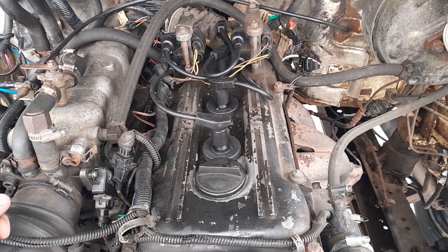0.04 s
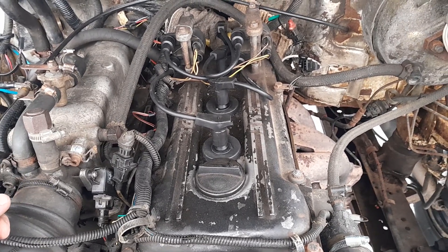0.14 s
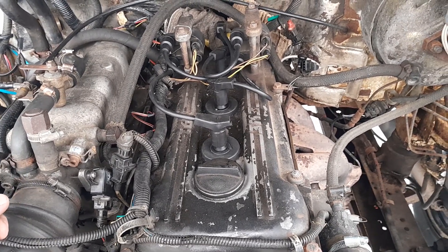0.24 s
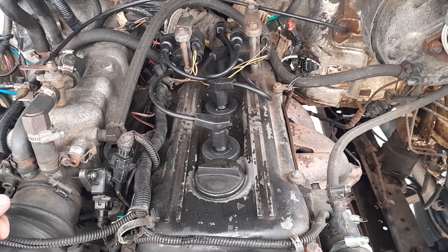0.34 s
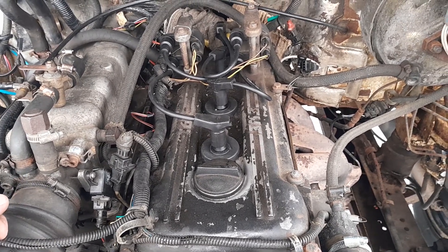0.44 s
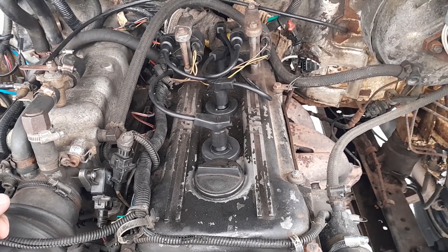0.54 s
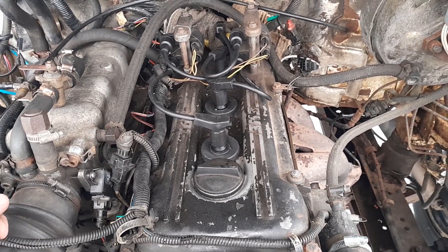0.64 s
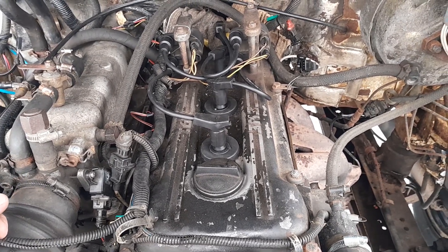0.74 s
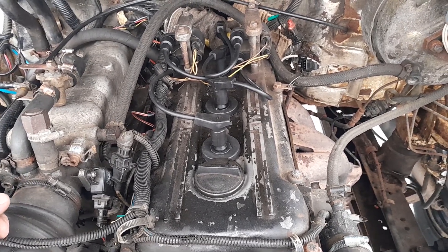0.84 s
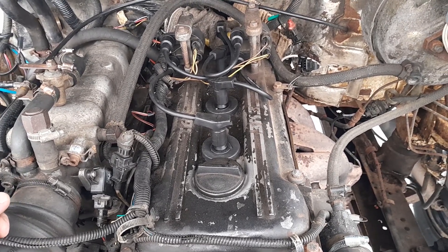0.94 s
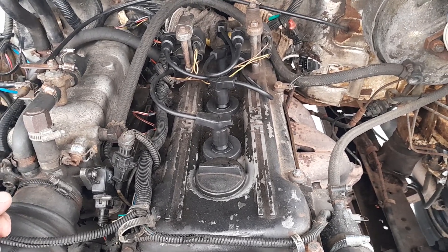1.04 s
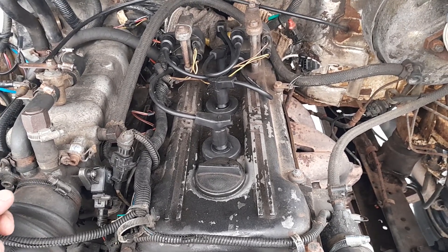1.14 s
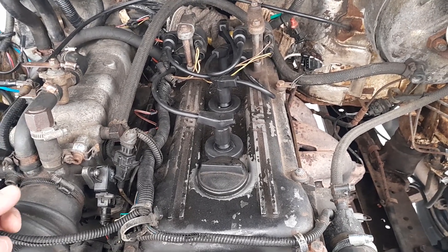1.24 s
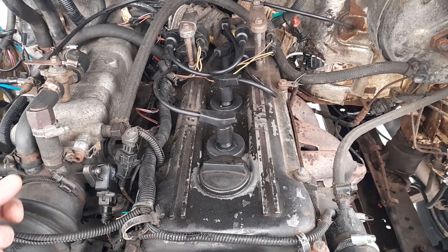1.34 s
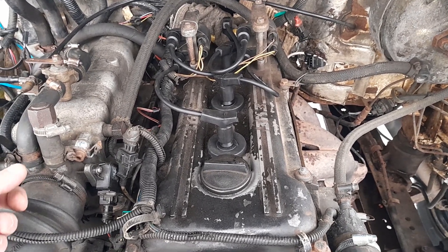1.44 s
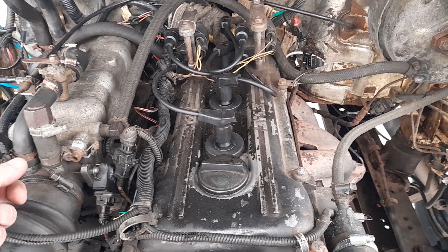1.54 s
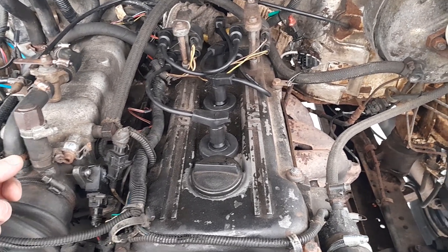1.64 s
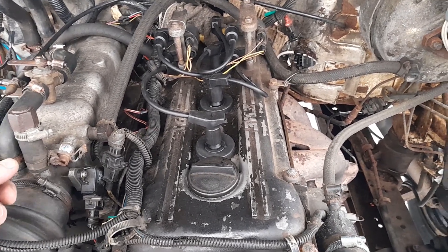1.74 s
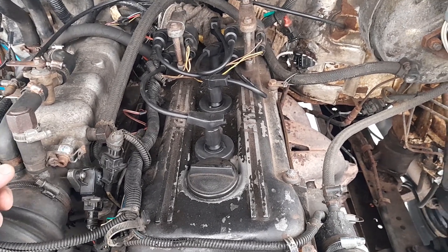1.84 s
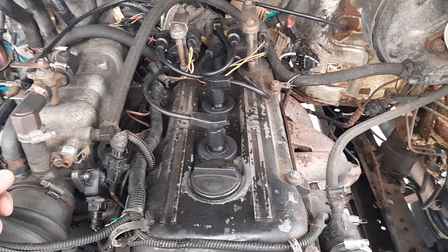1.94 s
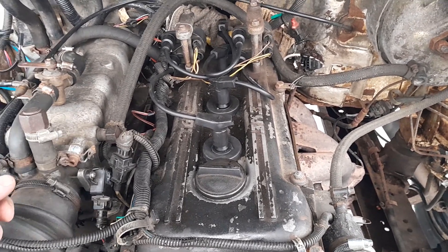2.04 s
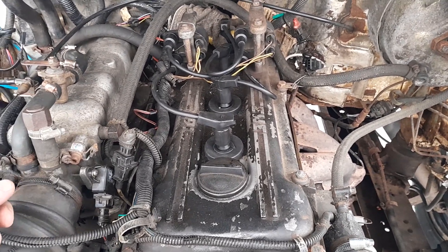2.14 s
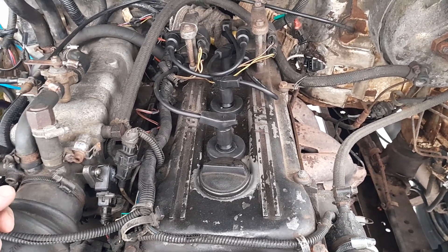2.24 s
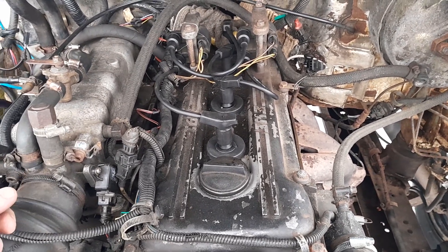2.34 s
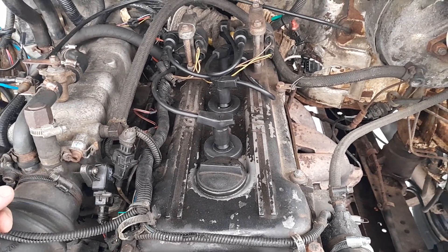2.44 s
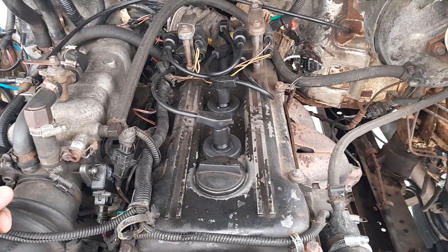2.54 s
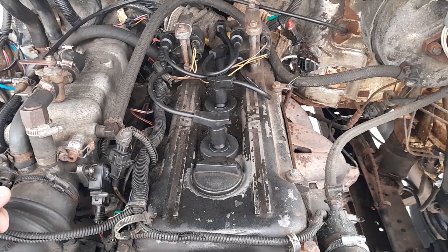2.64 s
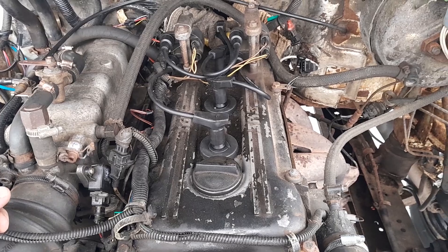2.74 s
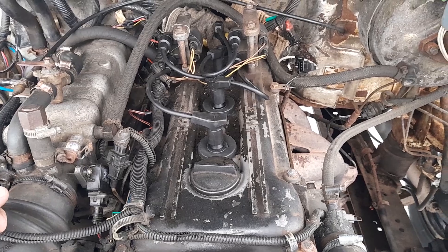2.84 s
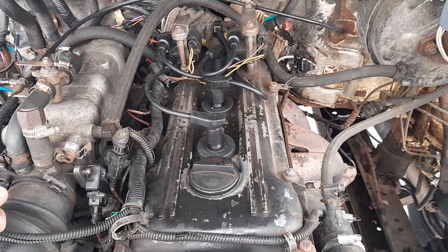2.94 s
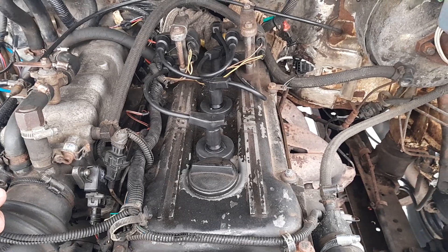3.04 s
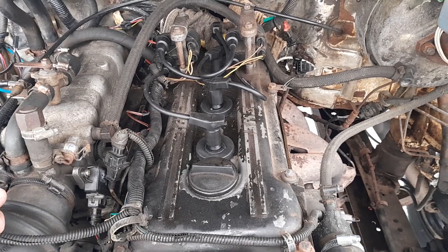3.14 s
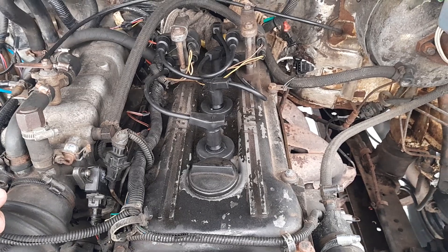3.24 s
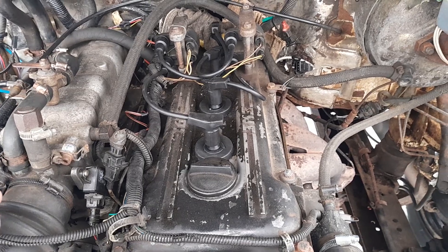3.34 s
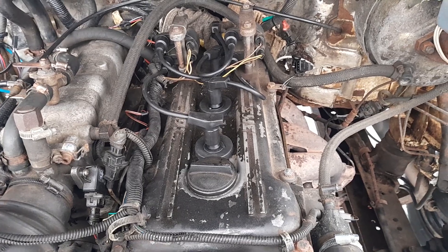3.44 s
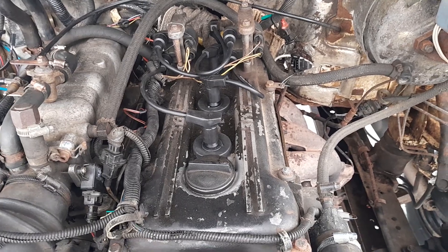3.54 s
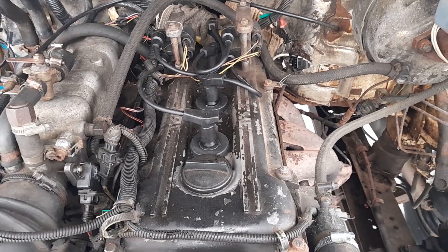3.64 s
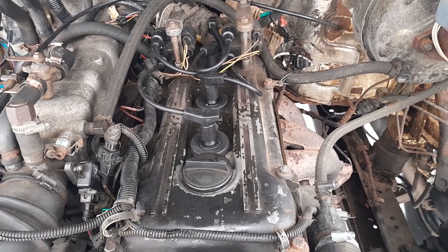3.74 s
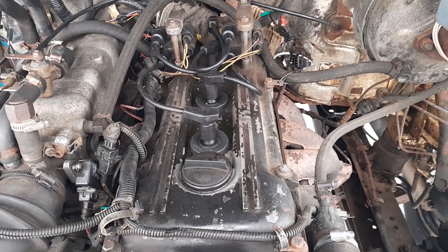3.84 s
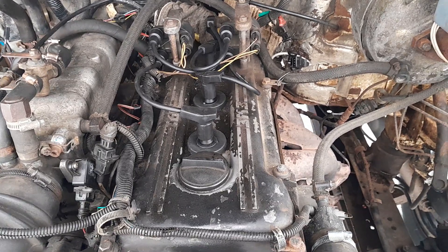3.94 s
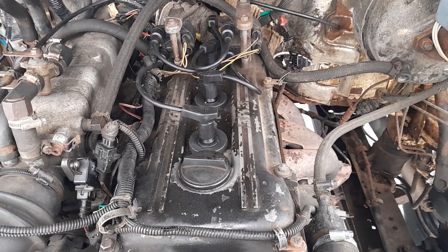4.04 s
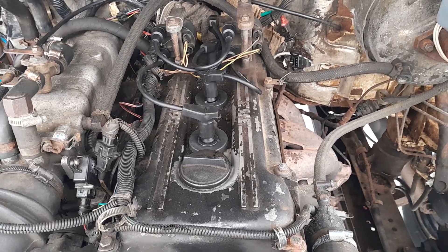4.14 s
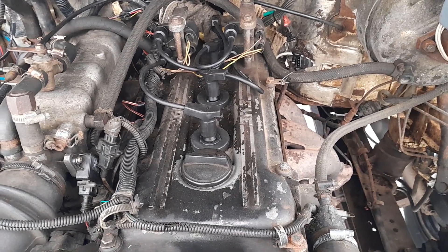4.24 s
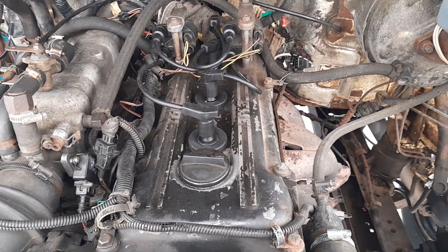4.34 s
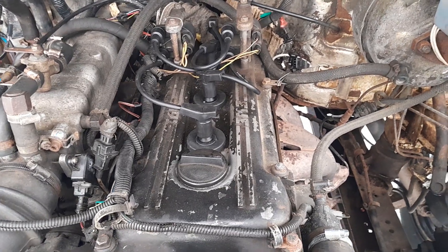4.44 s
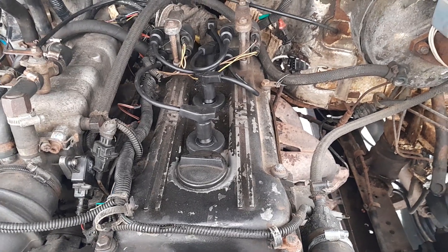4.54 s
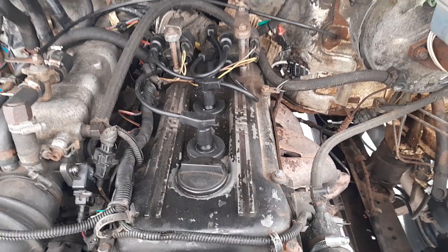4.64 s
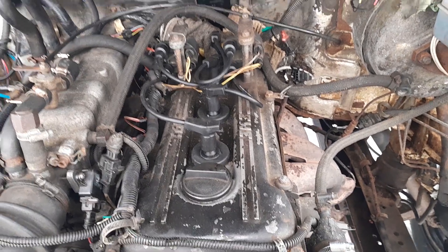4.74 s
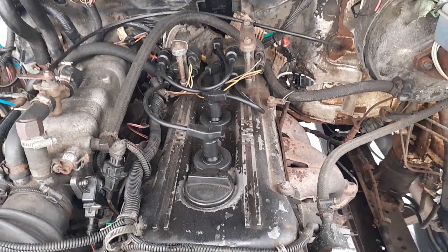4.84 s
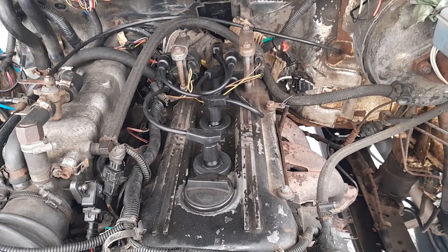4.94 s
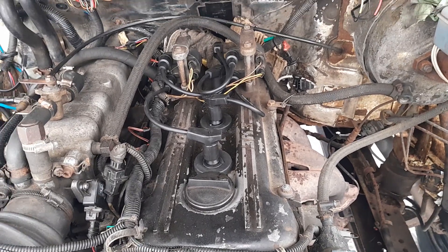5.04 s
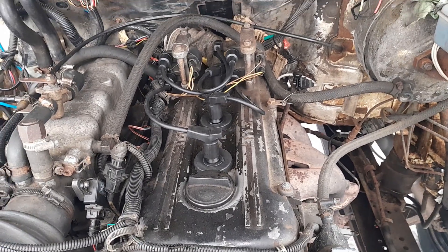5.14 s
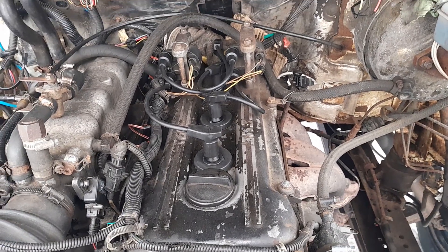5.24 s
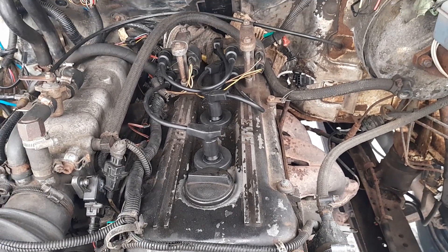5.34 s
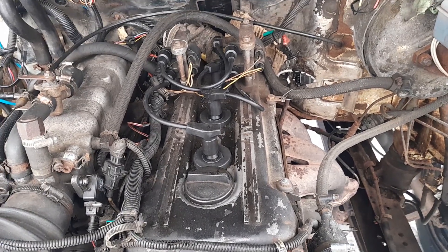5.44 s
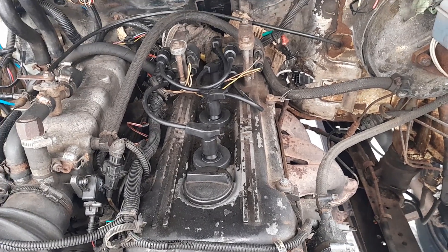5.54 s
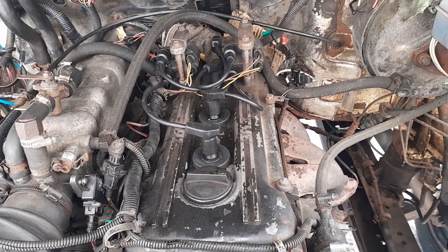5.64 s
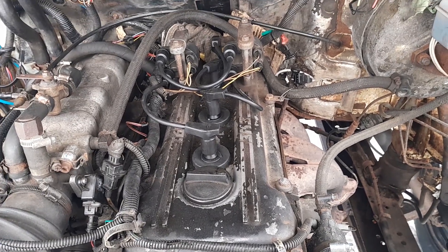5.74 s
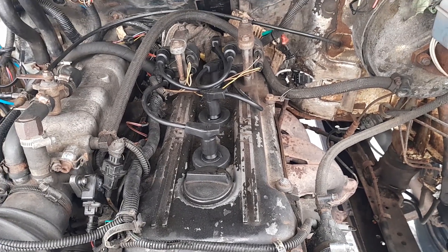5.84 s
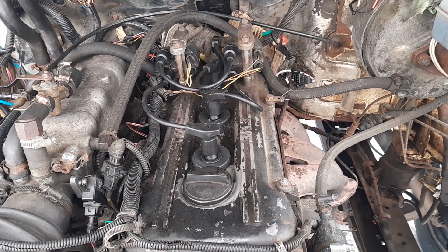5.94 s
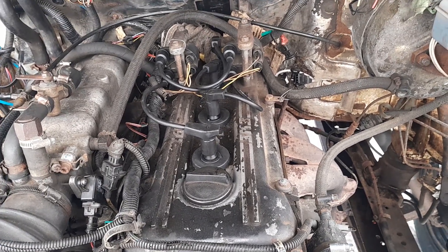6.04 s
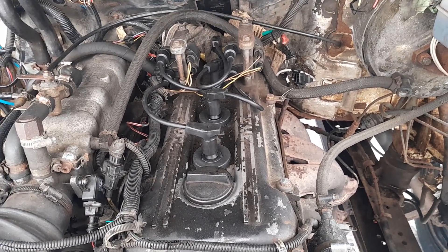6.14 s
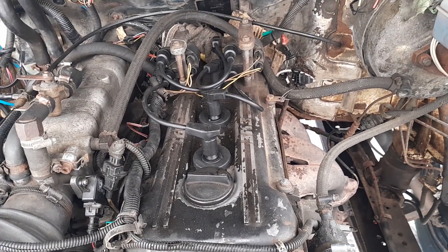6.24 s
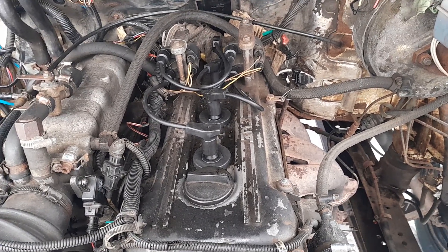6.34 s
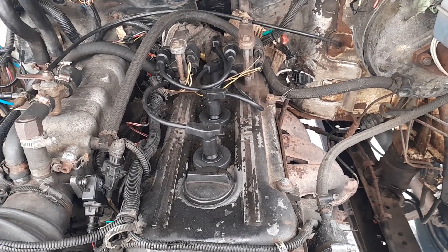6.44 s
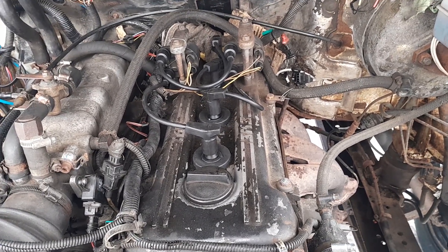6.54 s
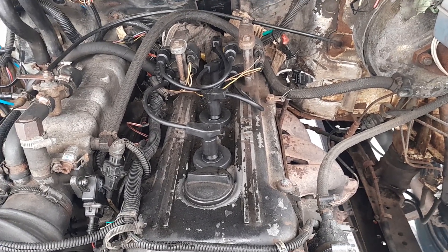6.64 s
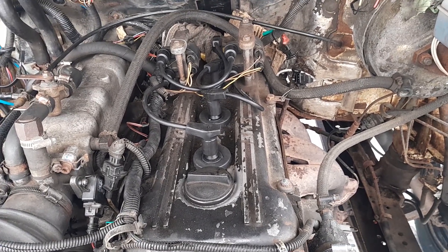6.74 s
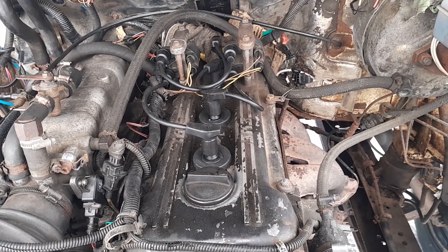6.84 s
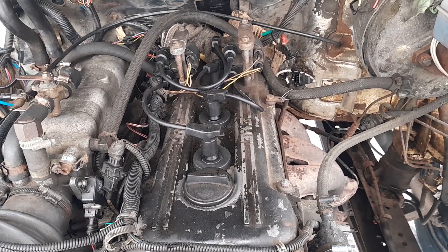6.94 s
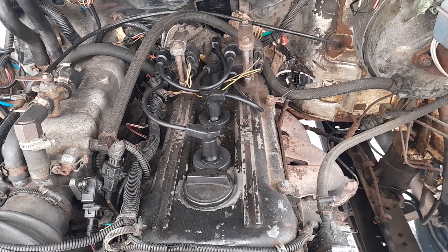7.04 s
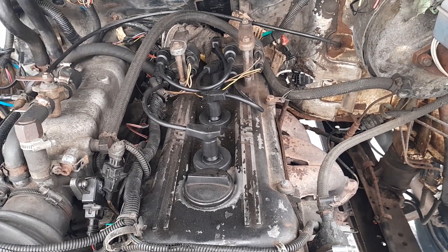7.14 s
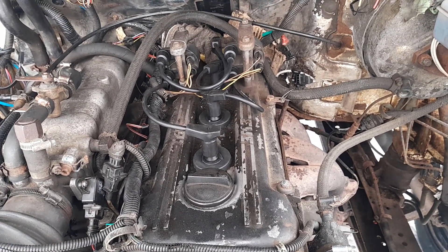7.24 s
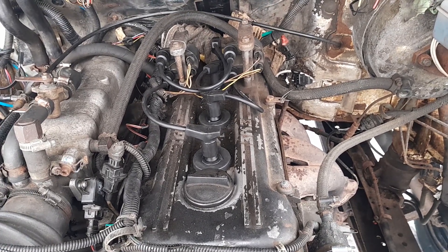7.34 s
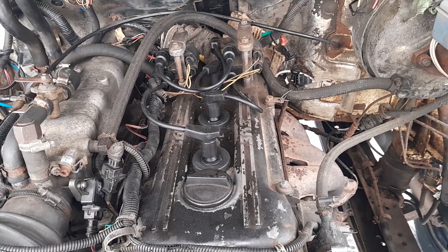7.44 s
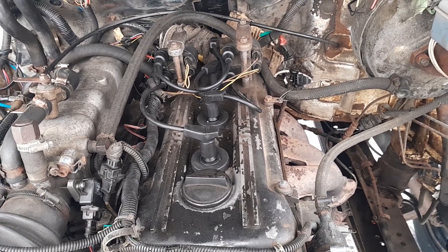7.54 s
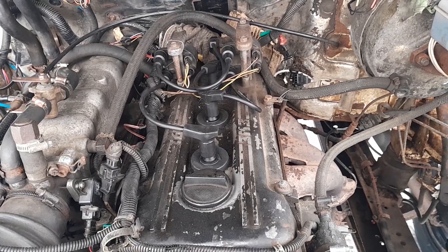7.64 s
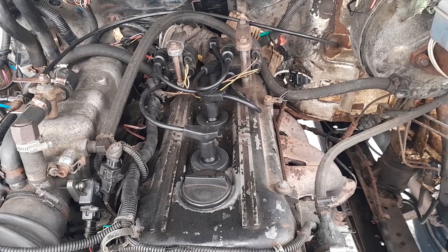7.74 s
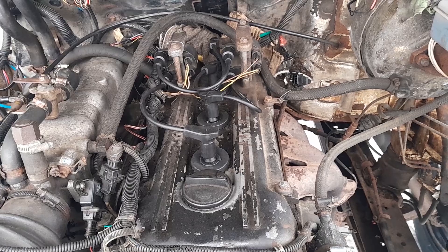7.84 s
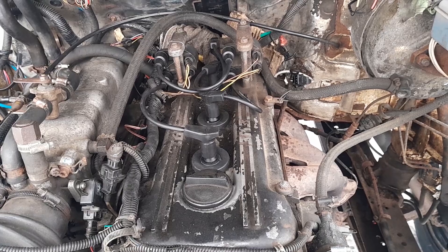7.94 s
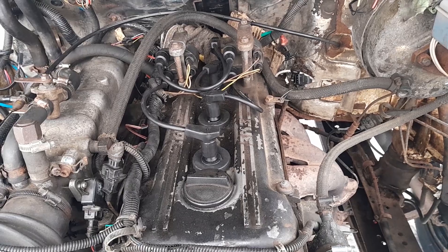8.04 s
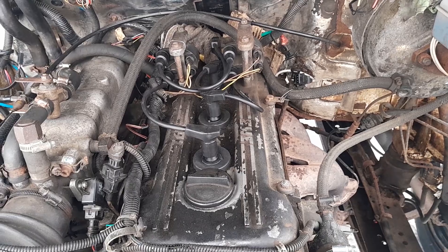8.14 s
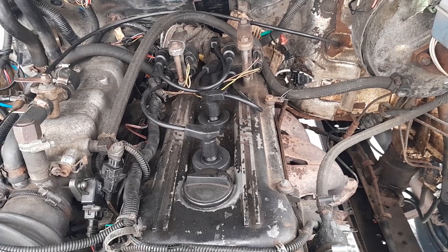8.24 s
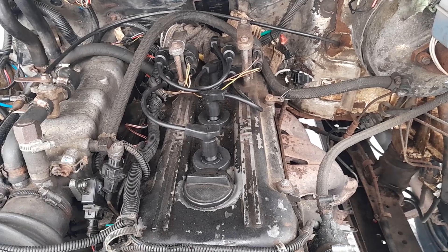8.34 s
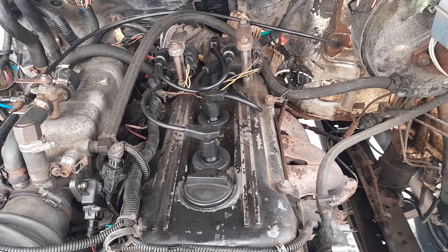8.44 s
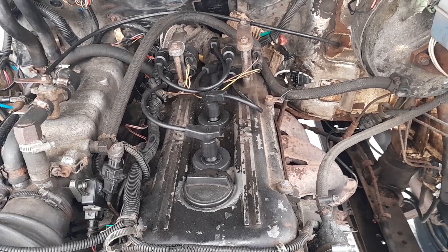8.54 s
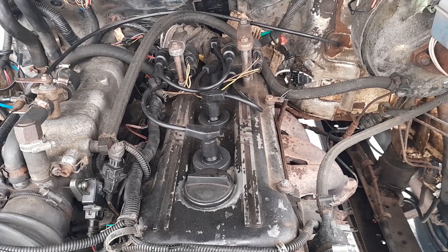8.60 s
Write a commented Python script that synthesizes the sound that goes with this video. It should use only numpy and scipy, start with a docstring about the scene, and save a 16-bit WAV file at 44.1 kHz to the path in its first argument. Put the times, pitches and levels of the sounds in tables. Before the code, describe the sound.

A petrol van engine runs down, revs once in a quick blip, burbles down again and settles into a steady, ticking idle.

```python
"""A four-cylinder petrol van engine under its open hood. It runs down from a blip: exhaust pulses boom and
burble, the block thuds, the belt drive whines, valves clatter, the chain rasps, a panel sings, the throttle
gulps air. As speed sags, a loose tappet ticks through and the idle valve opens with a hiss. At 1.5 s a
second blip lifts the speed to its peak at 2.2 s; a longer, burbling run-down follows. From 4.9 s the idle
takes hold and the whole engine grows louder."""
import sys
import numpy as np
from scipy.fft import rfft, irfft, next_fast_len
from scipy.io import wavfile
from scipy.ndimage import map_coordinates

SR = 44100
rng = np.random.default_rng(int(sys.argv[2]) if len(sys.argv) > 2 else 0)


def digitize_waveform(pressure):
    """Quantize a signal to 16-bit integers and store it at the path in sys.argv[1].

    Rows of a 2-D input are taken as channels; values are limited to [-1, 1].
    """
    field = np.atleast_2d(pressure).T
    bounded = np.clip(field, -1, 1)
    quanta = np.round(bounded * 32767).astype(np.int16)
    wavfile.write(sys.argv[1], SR, quanta)


N = 382347

# Engine speed. Each row: time in seconds, firing rate in Hz.
FIRING_RATE = [(0.0, 86.66), (0.2, 81.38), (0.46, 69.08), (1.0, 52.3), (1.55, 35.51), (1.76, 53.67),
               (2.0, 93.54), (2.2, 123.93), (2.98, 91.34), (3.2, 83.12), (3.44, 71.29), (4.0, 53.84),
               (4.58, 35.6), (5.15, 31.01), (6.25, 31.87), (7.0, 31.44), (8.67, 31.61)]
# Pipe boom, throttle shut. Each row: firing rate in Hz, level in dB.
PIPE_BOOM = [(31, -30), (35, -33.5), (40, -35), (43.5, -25.5), (54, -24.5), (62, -14.5), (72, -16),
             (83, -12), (94, -17.5), (104, -11.5), (122, -13)]
# Exhaust pulse; fractional orders come from unequal cylinders.
# Each row: multiple of the firing rate, overrun weight in dB, loaded weight in dB.
PULSE_ORDERS = [(.5, -33, -32), (.75, -39, -35), (1, 3, 1), (1.5, -28, -33), (2, -23, -5.5),
                (2.75, -45, -22), (3, -18.5, -12.5), (4, -21.5, -15.5), (5, -37.5, -24), (6, -36, -28)]
# Uneven firings. Each row: time in seconds, pop level in dB, drop of the exhaust note in dB.
UNEVEN_FIRINGS = [(.235, -24, -1), (.285, -36, 2), (.57, -23, 16), (.812, -26, -2.5), (.98, -31, 4),
                  (1.02, -29, -3), (1.21, -30.5, 9), (1.29, -36, -6), (1.785, -17, 5.5), (1.855, -30, -1),
                  (1.905, -21, 4), (2.19, -49, 8.5), (2.86, -17, 6), (3.19, -20.5, -1.5), (3.53, -26, 6),
                  (3.75, -25.5, 4), (4.1, -34, -3.5), (4.18, -36, 15), (4.26, -36, -1)]
# Knocks and tappets; the loose tappet strikes twice. Each row: place in the cycle 0-1, weight in dB.
CYCLE_KNOCKS = [(.02, -10.5), (.055, -7), (.095, -4), (.18, -4), (.27, -14), (.31, -2), (.4, -2), (.52, -5),
                (.56, -14.5), (.63, -3), (.7, -7.5), (.785, -6.5), (.84, -2), (.9, -17), (.965, -4)]
TAPPET_STRIKES = [(.105, 5), (.138, 5.5), (.385, -12), (.625, -12), (0.881, -1)]
# Belt and timing gear tones. Each row: multiple of the firing rate, relative level in dB.
WHINE_ORDERS = [(5, -10.5), (6, -4.5), (7, -13), (8, -19), (10, -9.5), (11.45, -6.5), (15.2, -19)]
# Panel swells and throttle gulps. Each row: peak time in seconds, level in dB.
PANEL_SWELLS = [(.02, -40), (.26, -33.5), (.58, -32), (.95, -41.5), (2.19, -35), (2.96, -32.5), (3.54, -37)]
AIR_GULPS = [(.2, -43), (1.8, -44), (1.96, -41.5), (2.85, -45), (3.4, -44)]
# Source spectra. Each row: frequency in Hz, relative level in dB.
PIPE_SPECTRUM = [(20, -45), (31, -35.5), (41, -21), (48, -14), (63, 0), (78, 3), (95, 7.5), (108, 9),
                 (122, -14.5), (138, -4.5), (158, 0), (180, -7.5), (205, -0.5), (235, -14), (400, -25)]
GAS_SPECTRUM = [(15, -50), (35, -23), (55, 7.5), (100, 12), (150, -3), (220, -11.5), (400, -12.5),
                (900, -90)]
BLOCK_SPECTRUM = [(20, -26), (60, 17.5), (130, 3), (190, 3.5), (260, 1), (330, 0), (420, 0), (490, -2),
                  (560, 0), (740, 2.5), (820, 0), (890, -9.5), (1300, -18), (4000, -62)]
COVER_SPECTRUM = [(200, -56), (600, -16), (900, -14), (1090, -4), (1240, -4.5), (1400, -4.5), (1550, -3.5),
                  (1720, -0.5), (1900, -3), (2100, -3), (2400, -5.5), (3200, -14), (4200, -17), (9000, -28)]
CHAIN_SPECTRUM = [(1200, -54), (2800, 7), (4000, 1), (5500, 1.5), (7000, 0.5), (7800, 2.5), (9000, -9),
                  (12000, -9.5), (16000, -14)]
TAPPET_SPECTRUM = [(1000, -13), (2500, 15.5), (4500, 9.5), (6500, 11), (8200, 13.5), (9500, 2), (16000, 6)]
IDLE_AIR_SPECTRUM = [(1300, -32), (2100, 13.5), (2450, -17), (3300, 6), (4300, -11), (7000, -6.5),
                     (8200, 3), (9200, -11), (11900, -11.5), (12650, 2), (13400, -5), (16000, -15)]
GULP_SPECTRUM = [(1500, -25), (5000, 10), (13000, 7), (16000, -25)]
# Engine bay and valve cover resonances. Each row: centre in Hz, width in Hz, lift in dB.
BAY_MODES = [(201, 41, 4.5), (321, 51, 5), (552, 31, 5), (633, 51, 6.5)]
COVER_MODES = [(1070, 22, 5), (1238, 51, 5.5), (1691, 164, 5), (2594, 31, 7.5), (3360, 15, 6)]
# Left-right likeness. Each row: frequency in Hz, coherence 0-1.
COHERENCE = [(130, 1), (300, 0.8), (700, 0.71), (1400, 0.2), (2800, 0.16), (6000, 0.05), (16000, 0)]
# Microphone balance. Each row: frequency in Hz, left minus right in dB.
BALANCE = [(60, 1.5), (92, 1.5), (140, 2), (210, 1.5), (330, 1), (500, -0.5), (770, 5), (1170, 1.5),
           (1790, 0.5), (2740, 2.5), (4190, 2.0), (6410, -2.5), (9810, 4), (15000, 1)]

# Gestures. Each row: start, attack, release start, release length, all in seconds.
THROTTLE_S = (1.518, 0.17, 2.084, 0.091)
PULL_S = (1.63, 0.12, 1.967, 0.11)  # combustion shakes the metal
LULL_S = (2.5, 0.63, 3.66, 0.8)

SETTLE_START_S, SETTLE_SPAN_S = 4.947, 0.68
FUEL_CUT_HZ, FUEL_BACK_HZ = 52.2, 44.2
COAST_LOAD, FUELLED_LOAD = 0.048, 0.95
BOOM_OPEN_SLOW_DB, BOOM_OPEN_FAST_DB, BOOM_IDLE_LIFT_DB = -13.5, -6, 12.5


def amp(db):
    """Decibels to gain."""
    return 10 ** (np.asarray(db) / 20)


def unit(x):
    """Scale to rms 1."""
    return x / np.sqrt(np.mean(x ** 2) + 1e-20)


def along(points, hz):
    """Interpolate (Hz, value) points on a log axis."""
    knots_hz, values = np.transpose(points)
    return np.interp(np.log(hz + 1), np.log(knots_hz + 1), values)


def ramp(x, start, span):
    """0 at start, linear to 1 over span, clipped."""
    return np.clip((x - start) / span, 0, 1)


def gesture(start_s, attack_s, end_s, release_s):
    """Attack, hold, release; 0-1."""
    t = np.arange(N) / SR
    return ramp(t, start_s, attack_s) * (1 - ramp(t, end_s, release_s))


def swells(times_s, sizes, half_width_s):
    """Sum of bell curves."""
    grid = np.arange(0, N, 32)
    bells = np.exp(-((grid[:, None] / SR - times_s) / half_width_s) ** 2)
    return np.interp(np.arange(N), grid, bells @ sizes)


def wobble(knot_hz):
    """Smooth random curve."""
    knots = rng.standard_normal(int(N * knot_hz / SR) + 4)
    return map_coordinates(knots, [np.arange(N) * knot_hz / SR])


def noise():
    """Two independent white noises."""
    return rng.standard_normal((2, N))


def filtered(x, response):
    """Apply a frequency response."""
    size = next_fast_len(N + SR // 2)
    return irfft(rfft(x, size) * response(np.fft.rfftfreq(size, 1 / SR)), size)[..., :N]


def radiate(pair, spectrum, modes=()):
    """Colour two independent signals and spread them to stereo; mid at rms 1."""
    def response(hz):
        spread_rad = np.arccos(np.clip(along(COHERENCE, hz), 0, 1)) / 2
        lift_db = sum(db / (1 + (2 * (hz - centre) / width) ** 2) for centre, width, db in modes)
        return amp(along(spectrum, hz) + lift_db) * np.array([np.cos(spread_rad), np.sin(spread_rad)])
    mid, side = filtered(pair, response)
    return np.array([mid + side, mid - side]) / np.std(mid)


def strikes(firings, contacts, t60_s, scatter_db, jitter_s, fresh):
    """Contacts recurring every four firings; each has its own ring plus fresh noise per blow."""
    t = np.arange(SR // 16) / SR
    cycles = np.arange(int(firings[-1] / 4) + 1)
    pair = np.zeros((2, N + SR))
    for place, db in contacts:
        chance = rng.uniform(-1, 1, (len(cycles), 2))
        delays = np.abs(jitter_s * SR * chance[:, 0]).astype(int)
        starts = np.searchsorted(firings, 4 * (cycles + place)) + delays
        blows = amp(db + scatter_db * chance[:, 1:] - 60 * t / t60_s)
        indices = (starts[:, None] + np.arange(len(t))).ravel()
        for channel in pair:
            ring = rng.standard_normal(len(t)) + fresh * rng.standard_normal(blows.shape)
            channel += np.bincount(indices, (blows * ring).ravel(), len(channel))
    return unit(pair[:, :N])


def mechanical_db(speed, settled, base_db, rise_db, power, pull_db, idle_db, lull_db=-0.97):
    """Level rises with speed, in the pull and at settled idle; eases in the long run-down."""
    gestures_db = pull_db * gesture(*PULL_S) + lull_db * gesture(*LULL_S)
    return base_db + rise_db * speed ** power + gestures_db + idle_db * settled


def exhaust(rate_hz, firings, speed, settled):
    """Firing pulses boom in the pipe; load sharpens them, uneven firings break the note with a pop."""
    throttle = gesture(*THROTTLE_S)
    fuel = np.maximum(throttle, ramp(rate_hz, FUEL_CUT_HZ, FUEL_BACK_HZ - FUEL_CUT_HZ))
    load = COAST_LOAD + (FUELLED_LOAD - COAST_LOAD) * fuel
    open_db = BOOM_OPEN_SLOW_DB + (BOOM_OPEN_FAST_DB - BOOM_OPEN_SLOW_DB) * speed
    boom_db = along(PIPE_BOOM, rate_hz) * (1 - throttle) + open_db * throttle
    boom_db += BOOM_IDLE_LIFT_DB * settled + 0.94 * wobble(11)
    stumble = (4 * load * (1 - load)) ** 2  # half load fires unreliably
    pulses = firings - 0.19 + (0.003 + 0.032 * stumble) * wobble(25)  # valve opens after the spark
    note, power = np.zeros(N), np.zeros(N)
    for order, overrun_db, loaded_db in PULSE_ORDERS:
        weight_db = overrun_db + load * (loaded_db - overrun_db)
        flutter_db = 3 * (1 - load) * (order != 1) * wobble(21.93)
        gain = amp(along(PIPE_SPECTRUM, order * rate_hz) + weight_db + flutter_db)
        note -= gain * np.cos(2 * np.pi * order * pulses - 0.5)
        power += gain ** 2 / 2
    times_s, pop_db, drop_db = np.transpose(UNEVEN_FIRINGS)
    uneven_db = (0.5 + 2 * stumble) * wobble(35) - swells(times_s, drop_db, half_width_s=0.036)
    pops = swells(times_s, amp(pop_db), half_width_s=0.037)
    puffs = amp(boom_db - 22 + 4 * np.cos(2 * np.pi * pulses))
    gas = (pops + puffs) * radiate(noise(), GAS_SPECTRUM)
    return amp(boom_db + uneven_db) * note / np.sqrt(power) + gas


def block_rumble(firings, level_db):
    """The block thuds with the firings and excites the bay."""
    thuds = strikes(firings, CYCLE_KNOCKS, t60_s=0.067, scatter_db=1.5, jitter_s=0.00033, fresh=0.4)
    return amp(level_db) * radiate(thuds + 0.79 * noise(), BLOCK_SPECTRUM, BAY_MODES)


def belt_whine(rate_hz, firings, level_db, db_per_octave=5.5, waver_db=2.5, flutter_rad=0.92):
    """Belt drive and timing gear sing louder with shaft speed."""
    tones = np.zeros(N)
    for order, db in WHINE_ORDERS:
        gain = amp(db + waver_db * wobble(10))
        tones += gain * np.sin(2 * np.pi * order * firings + flutter_rad * wobble(60))
    return amp(level_db + db_per_octave * np.log2(rate_hz / rate_hz.max())) * tones


def valve_clatter(firings, level_db):
    """Valves knock and ring the cover."""
    knocks = strikes(firings, CYCLE_KNOCKS, t60_s=0.052, scatter_db=3, jitter_s=0.0002, fresh=0.71)
    gain = amp(level_db + 0.63 * wobble(10))
    return gain * radiate(knocks + 0.99 * noise(), COVER_SPECTRUM, COVER_MODES)


def chain_rasp(firings, level_db):
    """The chain rasps, tugged by each cam lobe."""
    tug_db = 1.2 * wobble(400) + 0.71 * wobble(10) - 0.35 * np.cos(2 * np.pi * firings)
    return amp(level_db) * radiate(noise() * amp(tug_db), CHAIN_SPECTRUM)


def tappet_ticks(rate_hz, firings, level_db, db_per_octave=-9):
    """Tappets tick at low speed; oil pressure takes up the slack as speed rises."""
    taps = strikes(firings, TAPPET_STRIKES, t60_s=0.035, scatter_db=1, jitter_s=0.0004, fresh=3.2)
    slack_db = db_per_octave * np.log2(rate_hz / rate_hz.min())
    return amp(level_db + slack_db) * radiate(taps, TAPPET_SPECTRUM)


def panel_ring(ring_hz=638.5):
    """One sheet-metal resonance, wavering, in brief swells."""
    times_s, db = np.transpose(PANEL_SWELLS)
    hum = np.sin(2 * np.pi * ring_hz * np.arange(N) / SR + 0.17 * wobble(45))
    return swells(times_s, amp(db), half_width_s=0.064) * unit(hum * amp(2.2 * wobble(70)))


def throttle_gulps():
    """Short hisses of air past the throttle."""
    times_s, db = np.transpose(AIR_GULPS)
    return swells(times_s, amp(db), half_width_s=0.051) * radiate(noise(), GULP_SPECTRUM)


def idle_air(rate_hz, firings, settled, shut_hz=53, open_hz=32, shut_db=-66, open_db=-45.5, idle_db=9):
    """The idle valve opens as speed sags; air hisses past, harder on each intake stroke."""
    opening = ramp(rate_hz, shut_hz, open_hz - shut_hz)
    level_db = shut_db + (open_db - shut_db) * opening + idle_db * settled
    stroke_db = 0.6 * np.sin(2 * np.pi * firings)
    return amp(level_db + stroke_db) * radiate(noise(), IDLE_AIR_SPECTRUM, COVER_MODES)


def scene():
    """Sum the sources; the running count of firings keeps the moving parts in step."""
    t = np.arange(N) / SR
    rate_hz = np.interp(t, *np.transpose(FIRING_RATE))
    firings = np.cumsum(rate_hz) / SR
    speed = np.log(rate_hz / rate_hz.min()) / np.log(rate_hz.max() / rate_hz.min())  # 0-1
    settled = ramp(t, SETTLE_START_S, SETTLE_SPAN_S)
    rumble_db = mechanical_db(speed, settled, base_db=-40, rise_db=7.5, power=0.77, pull_db=6, idle_db=7.5)
    clatter_db = mechanical_db(speed, settled, base_db=-37, rise_db=10, power=2, pull_db=2.5, idle_db=7)
    rasp_db = mechanical_db(speed, settled, base_db=-43, rise_db=9.5, power=2, pull_db=3.5, idle_db=5.5)
    return (exhaust(rate_hz, firings, speed, settled)
            + block_rumble(firings, rumble_db)
            + belt_whine(rate_hz, firings, rumble_db - 2)
            + valve_clatter(firings, clatter_db)
            + chain_rasp(firings, rasp_db)
            + tappet_ticks(rate_hz, firings, rasp_db - 1.24)
            + panel_ring()
            + throttle_gulps()
            + idle_air(rate_hz, firings, settled))


def record(dry):
    """Left microphone slightly nearer and louder; peaks rounded, band limited."""
    left_lead_s, ceiling, top_hz = 0.00007, 0.96, 15900
    sides = np.array([[0.5], [-0.5]])

    def placement(hz):
        return amp(sides * along(BALANCE, hz)) * np.exp(2j * np.pi * hz * left_lead_s * sides)
    heard = filtered(dry, placement)
    rounded = heard / (1 + np.abs(heard / ceiling) ** 10) ** 0.1
    return filtered(rounded, lambda hz: hz < top_hz)


dry = scene()
out = record(dry)
digitize_waveform(out)
```